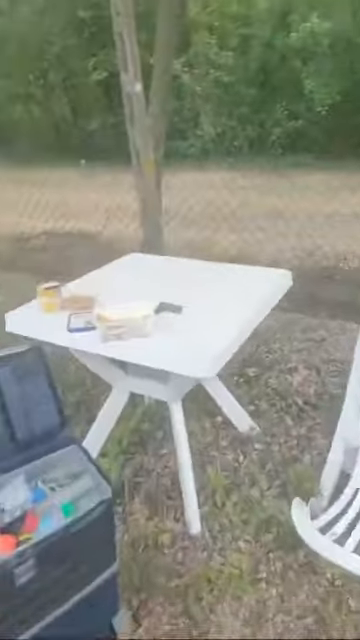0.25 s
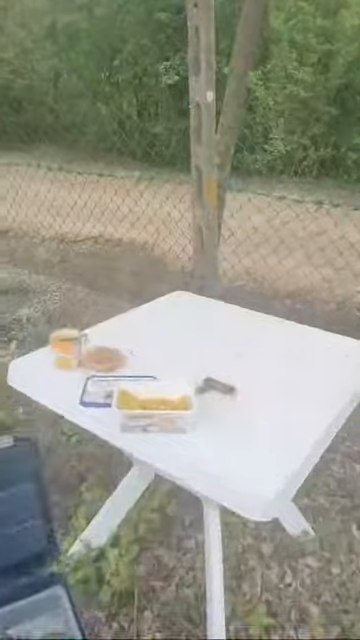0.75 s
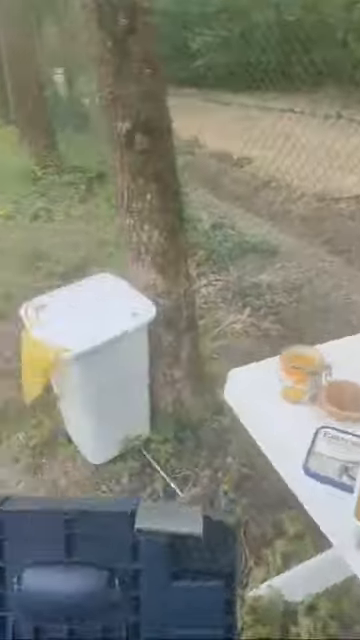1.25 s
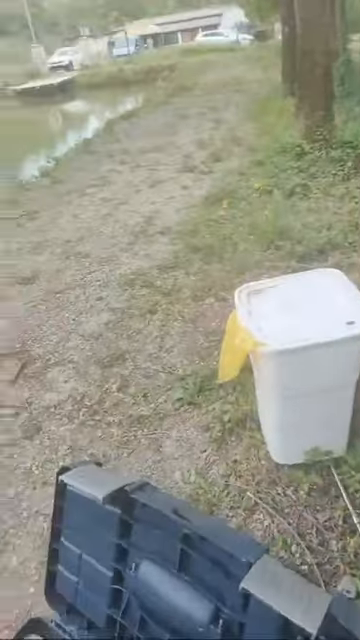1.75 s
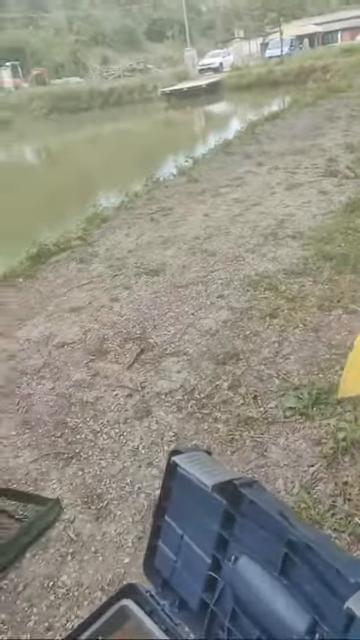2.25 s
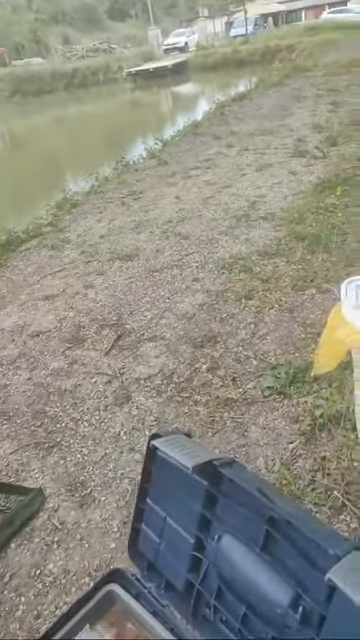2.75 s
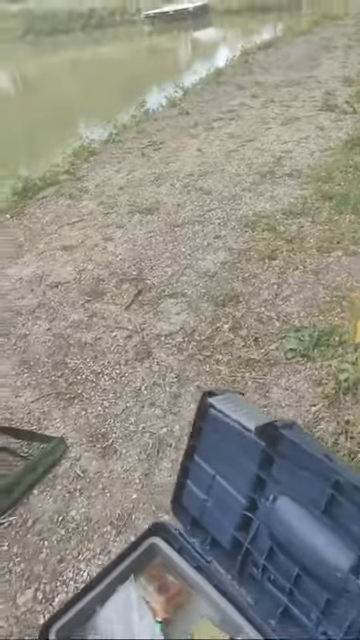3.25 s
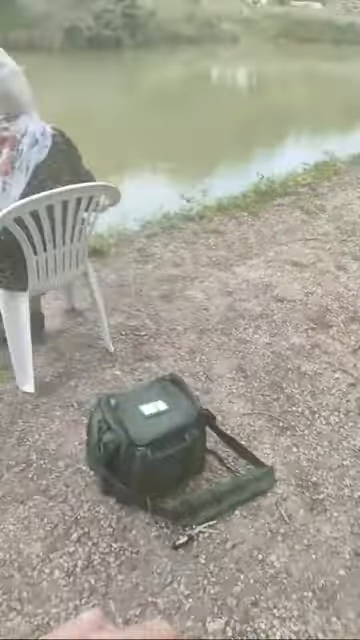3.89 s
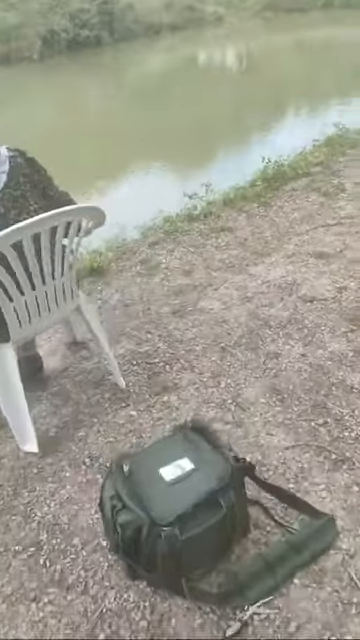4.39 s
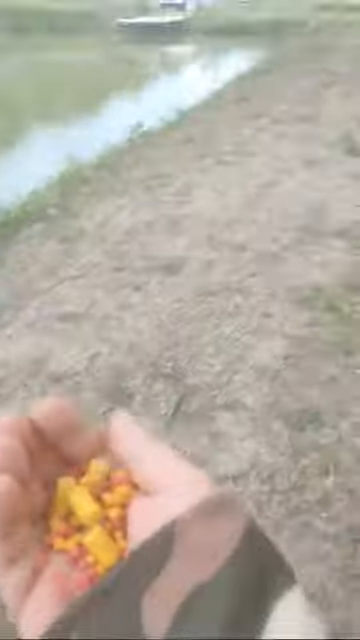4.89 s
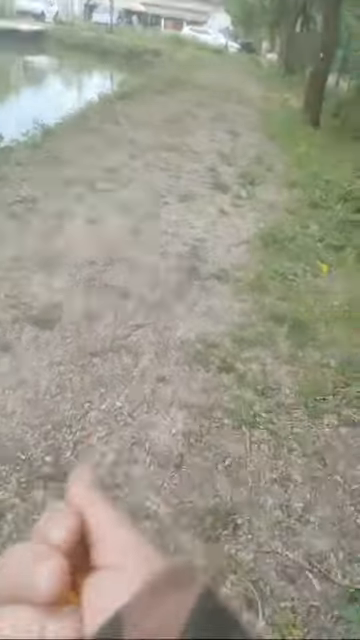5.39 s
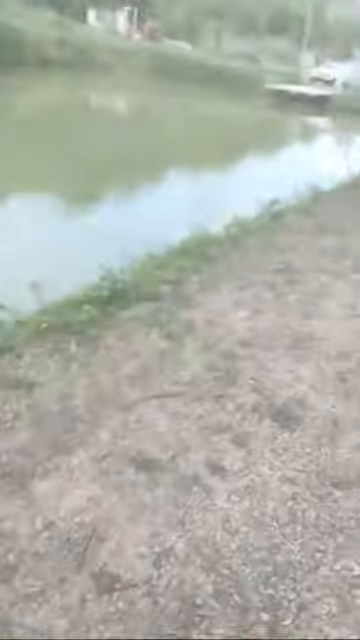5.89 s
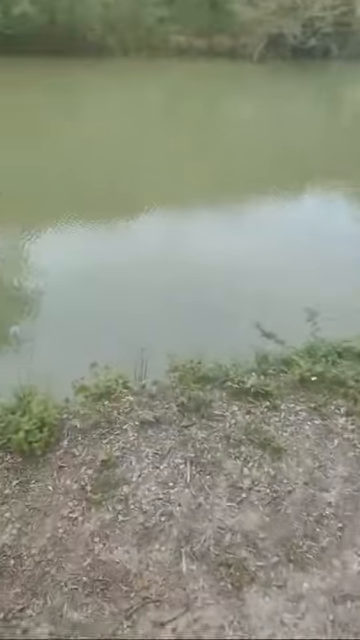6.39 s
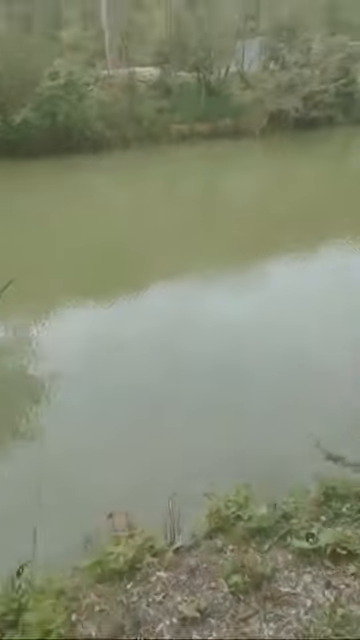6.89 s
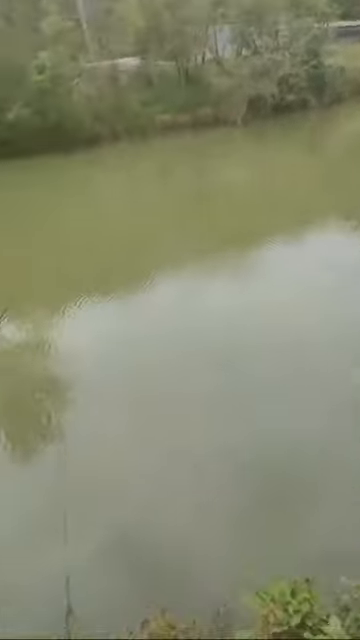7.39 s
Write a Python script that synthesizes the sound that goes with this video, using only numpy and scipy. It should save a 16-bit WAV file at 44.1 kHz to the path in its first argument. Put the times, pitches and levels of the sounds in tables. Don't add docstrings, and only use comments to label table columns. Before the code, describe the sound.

Outdoor lakeside walk: soft air and birdsong, a gritty hollow plastic scrape, cloth rubs, then crunching pebbles under low buffeting wind.

```python
import sys
import numpy as np
from scipy import signal
from scipy.fft import rfft, irfft, next_fast_len
from scipy.io import wavfile

SR = 44100
rng = np.random.default_rng(int(sys.argv[2]) if len(sys.argv) > 2 else 0)


def how_loud(loudness_db):
    steps = np.asarray(loudness_db, float) / 20
    return 10 ** steps


def transcribe(signal):
    frames = np.atleast_2d(signal).T
    limited = np.clip(frames, -1, 1)
    pcm = np.round(limited * 32767).astype(np.int16)
    wavfile.write(sys.argv[1], SR, pcm)


N = 336924

# time_s, rumble_db
BREEZE = [(0, -49.5), (.45, -44.5), (1.05, -49), (1.45, -54), (2.1, -58.5), (2.9, -54), (3.4, -66),
          (3.95, -60.5), (4.15, -49.5), (4.9, -50.5), (5.6, -48.5), (5.9, -54), (6.25, -34), (6.6, -30.5),
          (7.05, -42.5), (7.35, -31.5), (7.64, -38)]
# time_s, peak_db, pitch_hz
THUMPS = [(4.611, -28.5, 132), (4.688, -28, 194), (4.706, -23.5, 184), (4.724, -23, 137), (5.282, -14, 238),
          (5.336, -18.5, 160), (5.38, -22.5, 193), (5.424, -22, 220), (5.525, -26, 175.5),
          (5.959, -27, 157.2), (6.148, -17.5, 197), (6.208, -18.5, 204), (6.27, -20, 212),
          (6.345, -17.5, 211), (6.475, -17, 208), (6.54, -19, 154), (6.587, -24, 176), (6.628, -20, 194),
          (6.667, -19, 240), (6.727, -21.5, 180), (6.758, -24, 240), (6.904, -22.5, 240),
          (7.103, -24.5, 169), (7.314, -19.5, 173), (7.342, -20.5, 190), (7.385, -21, 195),
          (7.427, -24.5, 188), (7.52, -16.5, 177), (7.546, -22, 257), (7.602, -17.5, 191)]
# time_s, peak_db, pitch_hz
PUFFS = [(.377, -34, 190), (.647, -35, 167), (.818, -36, 200), (1.433, -36, 135), (2.271, -32, 109),
         (2.29, -28.5, 165), (2.397, -34.5, 146), (2.435, -35, 127), (2.657, -40, 181), (2.466, -32.5, 162),
         (2.756, -38.5, 140), (2.999, -36.5, 124), (3.315, -35, 111.5), (3.604, -30, 136),
         (3.728, -41.5, 130), (4.297, -28, 140), (4.774, -33, 145), (5.93, -32.5, 136)]
# time_s, peak_db
BUMPS = [
    (1.977, -28.5),
    (1.99, -29.5),
    (2.205, -30.5),
    (2.339, -30.5),
]
# middle_s, half_length_s, depth_db
LULLS = [(1.198, 0.08, -7.5), (1.688, 0.11, -26), (2.296, 0.039, -3), (5.035, 0.1, -21.5),
         (5.402, 0.1, -10), (5.728, 0.076, -24), (6.456, 0.017, -13), (6.502, 0.015, -21),
         (7.168, 0.064, -10.5), (6.881, 0.013, -9), (7.055, 0.014, -9), (6.971, .015, -7.5)]
# pitch_hz, level_db_per_hz
RUMBLE_COLOUR = [(15, -63), (25, -43), (59, -8), (162, 1.5), (316, -14), (349, -16.5), (700, -32.5),
                 (910, -40.5), (1540, -120)]

# time_s, pressure_db
SCRAPE = [(1.84, -46), (1.885, -38), (1.98, -35), (2.05, -43), (2.19, -33), (2.3, -42), (2.58, -47.5),
          (2.66, -43.5), (2.86, -56.5)]
# middle_s, half_length_s, change_db
LEANS = [(1.89, 0.013, 3), (1.905, 0.0082, -7.5), (1.946, 0.019, 0.5), (2.012, 0.016, -2.5),
         (2.108, 0.006, -4), (2.62, .006, 1), (2.145, 0.0097, 2), (2.161, .01, -3.5), (2.222, 0.013, 3.5),
         (2.307, .015, -3), (2.4, .012, -4), (2.515, 0.016, 1.5), (2.562, 0.011, 9.5), (2.58, .005, -1),
         (2.718, 0.0074, -7.5), (2.762, 0.0069, -7), (2.774, 0.0094, 10.5), (2.806, 0.0056, 10)]
# time_s, peak_db, bright_edge_db (relative)
SNAGS = [(1.85, -26, -12), (1.921, -39.5, 19), (1.954, -25, 6), (1.973, -14, -9), (1.984, -27.5, -2),
         (2.097, -46, 11), (2.116, -25.5, 5), (2.137, -39, 2), (2.185, -38, 14), (2.233, -21, -15),
         (2.271, -27, -11), (2.329, -23, 6), (2.362, -29, -19), (2.444, -26, 0), (2.588, -29.5, 2),
         (2.621, -30.5, 4.5), (2.641, -27, -1), (2.727, -33.5, 5), (2.767, -32.5, 5), (2.791, -22.5, -3),
         (2.811, -15, -14.5), (2.863, -35.5, -4)]
# time_s, peak_db, bright_edge_db (relative)
TICKS = [(2.251, -26, -10), (2.279, -20.5, 3.5), (2.385, -28, -5), (2.423, -29.5, 4.5), (2.465, -34, -8),
         (2.487, -34, 5), (2.498, -34, 7), (2.542, -28, -9), (2.571, -19, -12), (2.653, -26.5, 1),
         (2.68, -38, 3), (2.691, -28.5, -1), (2.698, -28, 3), (2.738, -35, 2), (2.837, -35, -1),
         (2.853, -35, -1)]
# pitch_hz, level_db_per_hz
SCRAPE_COLOUR = [(150, -60), (250, -7.5), (325, -13), (510, -4), (690, -7), (960, 4.5), (1310, -7),
                 (1910, -7.5), (2700, -7), (3400, -6.5), (3770, 1), (4990, -21.5), (6470, -14),
                 (8400, -26.5), (10300, -25), (16000, -33)]

# middle_s, half_length_s, grit_db, top_db (relative), dull_db (relative)
SCUFFS = [(0.876, 0.047, -66.5, 2, 6), (1.727, 0.1, -83.5, 11, -7), (1.373, 0.04, -57, 0.5, -1.5),
          (1.46, 0.039, -70, 3.5, 1), (3.072, 0.014, -55.5, -0.5, -13), (3.235, 0.016, -59, -7, -28),
          (3.495, 0.016, -62.5, -2.5, -28), (4.03, .04, -75, 1, 0), (3.845, 0.049, -70.5, -2.5, -12),
          (4.726, 0.032, -76, -4, 0), (5.294, 0.17, -70, -6, -29), (5.828, 0.046, -44.5, -8, -4.5),
          (5.946, 0.06, -51.5, -18, -10.5), (6.154, 0.054, -46, -7.5, -3), (6.254, 0.052, -59.5, -10, -1),
          (6.423, 0.054, -66, -8, 4.5), (6.926, 0.019, -49.5, -14, -0.5), (7.303, 0.036, -57.5, -3, 3),
          (7.43, 0.027, -63.5, 0, 10), (7.463, .012, -71, 2, 0), (7.588, 0.07, -70.5, 0.5, 5),
          (6.082, 0.043, -69.5, -2, -4), (7.096, 0.03, -68, -3, 6), (6.578, 0.021, -62, -7, -3),
          (6.885, .012, -70, -4, 2)]
# time_s, peak_db, low_ring_hz, bright_db (relative), top_db (relative)
PEBBLES = [(1.217, -49, 2480, -13, -13), (3.057, -41, 3900, -11, -8), (4.808, -36, 3600, -13, -21),
           (5.783, -42.5, 1000, -7, -1), (6.21, -41, 1500, -10, -15), (6.758, -55, 2000, -5, 3),
           (6.881, -45, 1900, -8, -7), (6.929, -48, 2000, -5, 3), (7.024, -50, 1200, -20, -30),
           (7.083, -48, 2200, -12, -8), (7.407, -53, 2000, 3, -3), (3.26, -50.5, 2930, -6, -28),
           (4.809, -33.5, 2480, -8, -32), (5.419, -43, 2730, -12, -12), (5.523, -45.5, 2520, -13, -25),
           (5.643, -30.5, 1390, -46.5, -23), (6.111, -28.5, 1600, 7.5, -23), (6.25, -50, 902, 7, 11.5),
           (6.328, -44.5, 2300, -12, -7), (6.426, -41.5, 1780, -8, -2), (6.57, -35, 2480, -1.5, -3),
           (6.766, -48, 2070, -3, 10), (6.869, -43, 1880, -10, -12), (6.916, -24.5, 2140, 3, -3.5),
           (7.016, -42, 2280, -26, -36), (7.073, -41.5, 1930, -15, -11), (7.102, -33.5, 2230, -42, -14),
           (7.264, -35, 1480, -7, -2), (7.284, -24, 2240, -14.5, -6.5), (7.304, -34.5, 1580, -4, -29),
           (7.415, -35.5, 3500, -0.5, -4), (7.435, -32, 3600, -6, -3), (7.463, -25.5, 2080, -34, -41),
           (7.542, -23, 2900, -4, -8.5), (7.546, -27, 1510, -30, -30), (7.634, -23, 1100, -30, -17)]
# pitch_hz, width_hz, level_db
GRIT = [(5910, 420, -7.5), (6520, 390, -6), (7160, 350, -10), (8920, 660, -24.5)]
# pitch_hz, width_hz, level_db
DIRT = [(1000, 400, -9), (1570, 280, -1), (2800, 600, 1.5), (4300, 400, -8)]

# time_s, rustle_db
RUSTLE = [(4.3, -104), (5.3, -79), (5.9, -71.5), (6.5, -65), (7.0, -63.5), (7.2, -60.5), (7.64, -50)]
# middle_s, half_length_s, level_db
GRIPS = [(1.051, 0.025, -53), (4.635, 0.046, -59), (4.72, 0.03, -58.5), (5.127, 0.027, -54.5),
         (5.046, 0.017, -57), (5.268, 0.0069, -51), (6.226, 0.013, -43.5), (6.703, 0.047, -64),
         (6.847, 0.014, -50)]
# start_s, length_s, level_db, whistle_hz,
# rising_share (of the length)
NARROW_HISSES = [(0.447, 0.057, -48.5, 3270, 0.26), (0.546, 0.23, -56.5, 3610, 0.067),
                 (2.885, 0.35, -62, 3770, 0.12), (3.055, 0.026, -45.5, 4400, 0.29),
                 (3.057, 0.035, -46.5, 3890, 0.21), (3.772, 0.26, -56.5, 3620, 0.27),
                 (4.551, 0.218, -48.5, 3700, 0.84), (5.058, 0.37, -52, 3720, 0.4),
                 (6.507, 0.16, -51.5, 3520, 0.395),
                 (4.70, 0.062, -52, 4150, 0.59), (5.245, 0.039, -41.5, 3900, 0.61),
           (4.56, 0.174, -64, 2450, 0.507), (5.16, .035, -62, 6200, .5), (5.25, 0.032, -56.5, 6700, .5),
           (5.29, 0.12, -65, 6300, .3), (5.11, .22, -72, 9200, .7), (4.71, .05, -71, 8600, .5),
           (6.515, 0.032, -61, 11600, 0.52), (6.375, 0.037, -58, 6000, .5), (6.695, .1, -59.5, 6550, 0.09),
           (6.5, 0.098, -57, 6500, .2), (5.045, 0.039, -52, 1800, .5), (6.4, 0.034, -60, 1400, .5),
           (1.352, 0.04, -50, 5000, .4), (1.385, .03, -59, 6600, .5), (5.83, .04, -55, 2400, .4),
           (5.4, 0.025, -59, 1500, 0.52), (1.8, .045, -70, 11400, .5), (1.655, .045, -70, 9700, .5),
           (1.75, .03, -72, 10000, 0.49), (6.5, 0.043, -66, 1600, .5), (5.925, .03, -62, 3900, 0.62),
           (6.125, 0.059, -49, 4300, .3), (5.78, 0.042, -47.5, 3250, 0.29), (2.975, .04, -57, 3800, 0.31),
           (5.055, 0.034, -46.5, 700, 0.49), (7.485, 0.028, -52, 860, .6), (6.13, 0.037, -51, 2600, .4),
           (1, .05, -60, 3200, 0.51), (5.97, 0.051, -54, 1550, 0.49), (5.795, 0.074, -51, 2500, 0.32),
           (4.63, .014, -41, 600, .2), (5.1, .04, -57.5, 1450, 0.49), (.455, 0.039, -55, 2600, 0.52),
           (7.33, 0.046, -52, 2250, 0.49)]

# start_s, length_s, pitch_hz, level_db
HELD_NOTES = [(0.711, 0.07, 3390, -56), (1.338, 0.12, 3460, -55), (1.577, 0.044, 3160, -52),
              (1.735, 0.04, 2264, -58), (2.87, 0.1, 2940, -48.5), (3.285, 0.1, 3330, -53.5),
              (3.5, 0.06, 3960, -60.5), (3.548, 0.097, 3394, -47), (3.138, 0.028, 2940, -43.5),
              (7.568, 0.024, 2720, -45), (7.451, 0.019, 2120, -48)]
# start_s, length_s, from_hz, to_hz, level_db
SLIDES = [(0.325, 0.15, 3980, 3940, -65.5), (0.482, 0.16, 2760, 3010, -55.5),
          (0.69, 0.024, 3650, 3450, -53), (0.777, 0.17, 3065, 3220, -63.5), (0.979, 0.12, 3640, 3650, -58),
          (1.142, .075, 2600, 3000, -63.5), (1.21, 0.063, 2980, 2870, -65.5),
          (1.277, 0.072, 3850, 3730, -61.5), (1.49, 0.095, 2390, 3070, -66),
          (1.795, 0.042, 1770, 1850, -60), (2.488, .05, 2210, 2300, -43), (2.87, 0.15, 1876, 2070, -64),
          (3.01, 0.11, 2060, 2045, -61.5), (2.835, 0.036, 3250, 3080, -52),
          (3.102, 0.034, 2605, 2764, -49.5), (3.172, .03, 2800, 2200, -61), (3.2, .03, 2380, 2340, -61.5),
          (3.419, 0.043, 3850, 3940, -50.5), (3.693, 0.047, 2920, 2730, -47.5),
          (3.636, 0.02, 3700, 2310, -49), (3.659, 0.028, 2480, 1840, -59), (3.804, 0.055, 3280, 3010, -52),
          (3.84, 0.042, 2870, 2350, -54), (3.08, .022, 3400, 2800, -70), (3.274, .03, 3800, 3400, -64),
          (3.385, .04, 3370, 3330, -62), (0.453, 0.023, 3650, 2750, -52), (7.375, .04, 2810, 2850, -63),
          (7.375, .04, 1890, 1900, -58), (7.378, .04, 950, 950, -61), (7.486, .045, 2250, 2140, -61),
          (7.599, .04, 2740, 2650, -52), (7.185, 0.046, 1940, 2290, -64)]
# pitch_hz, level_db_per_hz
AIR_COLOUR = [(24, -52), (40, -6), (81, 0), (167, -6), (290, -6.5), (1120, -15.5), (1720, -18.5),
              (2980, -14.5), (4460, -23), (6490, -22.5), (7930, -35), (10200, -33), (16000, -36.5)]


def rms_one(x):
    return x / np.sqrt(np.mean(x ** 2) + 1e-20)


def in_time(rows, fade=0.012):
    s, *columns = np.transpose(rows)
    t = np.arange(N) / SR
    gate = np.clip(np.minimum(t - s[0], s[-1] - t) / fade + .5, 0, 1)
    return [gate] + [np.interp(t, s, column) for column in columns]


def coloured(x, points):
    hz, level_db = np.transpose(points)
    size = next_fast_len(N)
    grid = np.arange(size // 2 + 1) * SR / size + 1
    gain = how_loud(np.interp(np.log(grid), np.log(hz), level_db, left=-90, right=-90))
    return rms_one(irfft(rfft(x, size) * gain, size)[:N])


def band(x, low_hz, high_hz):
    sos = signal.butter(2, [low_hz, min(high_hz, .45 * SR)], "band", fs=SR, output="sos")
    return signal.sosfilt(sos, x)


def resonance(x, hz, width_hz):
    r = np.exp(-np.pi * width_hz / SR)
    ring = [1, -2 * r * np.cos(2 * np.pi * hz / SR), r * r]
    return signal.lfilter(np.array([1, 0, -1]) * (1 - r * r) / 2, ring, x)


def modes(x, table):
    return sum((-1) ** k * how_loud(level_db) * resonance(x, hz, width_hz)
               for k, (hz, width_hz, level_db) in enumerate(table))


def drift(rate_hz):
    r = np.exp(-2 * np.pi * rate_hz / SR)
    slow = signal.lfilter([1], [1, -2 * r, r * r], rng.standard_normal(N + SR))
    return 2 * np.tanh(rms_one(slow[SR:]) / 2)


def grains(per_s, spread_db):
    sizes = how_loud(spread_db * np.minimum(rng.exponential(1, N), 5)) * rng.choice([-1, 1], N)
    return sizes * (rng.random(N) < per_s / SR)


def knock(draw, part, t60, rise=0.0003):
    t = np.arange(len(draw)) / SR
    decay = how_loud(-60 * t / t60) + 3.5 * how_loud(-60 * t / (0.17 * t60))
    sound = part(draw * (1 - np.exp(-t / rise)) * decay)
    return sound / np.abs(sound).max()


def swell(s, half):
    near = slice(max(round((s - 2 * half) * SR), 0), round((s + 3 * half) * SR))
    away = (np.arange(N)[near] / SR - s) / half
    return near, np.where(away < 0, np.exp(-away ** 8), np.exp(-away ** 2))


def add(out, s, piece):
    i = max(round(s * SR), 0)
    out[i:i + len(piece)] += piece[:N - i]


def breeze():
    gate, level_db = in_time(BREEZE)
    t = np.arange(N) / SR
    level_db = level_db + sum(depth_db * np.exp(-((t - s) / half) ** 4) for s, half, depth_db in LULLS)
    rebounds = [(s + 0.01905, peak_db - 15, 160) for s, peak_db, hz in THUMPS]
    bumps = [(s, peak_db, 400) for s, peak_db in BUMPS]
    pops = PUFFS + THUMPS + rebounds + bumps
    eddies = np.zeros(N)
    for (s, peak_db, hz), turn in zip(pops, rng.random(len(pops))):
        cycles = np.arange(-2, 4, hz / SR)
        sweep = cycles - 0.13 * cycles ** 2
        envelope = np.exp(-(cycles / np.where(cycles < 0, .7, 1.1)) ** 2)
        add(eddies, s - 2 / hz, how_loud(peak_db - 0.22) * envelope * np.cos(2 * np.pi * (sweep + turn)))
    fading = np.exp(-1 / (0.0075 * SR))
    wake = signal.lfilter([1 - fading], [1, -fading], np.abs(eddies))
    rumble = coloured(rng.standard_normal(N) * how_loud(3.0 * drift(25)), RUMBLE_COLOUR)
    return eddies + (how_loud(level_db - 1.0) + 0.43 * wake) * rumble


def scrape():
    gate, low_db = in_time(SCRAPE)
    since_start = np.arange(N) / SR - SCRAPE[0][0]
    for s, half, change_db in LEANS:
        low_db = low_db + change_db * np.exp(-((np.arange(N) / SR - s) / half) ** 2)
    bright_db = -1.5 + 3 * since_start
    slips = grains(3000 * how_loud(3.4 * drift(60)), spread_db=3.3) * how_loud(1.6 * drift(38))
    body = coloured(slips, SCRAPE_COLOUR)
    body = body + modes(body, [(944, 190, -6.5), (3850, 320, 4.5), (6560, 570, -9)])
    edges_hz = [200, 450, 700, 1200, 1800, 2600, 3300, 5000, 8000, 17000]
    parts = [(-1) ** k * band(body, low_hz, high_hz) * how_loud(2.6 * drift(30))
             for k, (low_hz, high_hz) in enumerate(zip(edges_hz, edges_hz[1:]))]
    parts[-1] = parts[-1] * how_loud(5 - 15 * np.clip(since_start, 0, 1))
    low, bright = rms_one(sum(parts[:5])), rms_one(sum(parts[5:]))
    return gate * how_loud(low_db) * (low + how_loud(bright_db) * bright) + scrape_cracks()


def scrape_cracks():
    out = np.zeros(N)
    for table, t60, rise, trim_db in [(SNAGS, .04, .0009, -1.5), (TICKS, .014, .0003, -6)]:
        for (s, peak_db, edge_db), draw in zip(table, rng.standard_normal((len(table), 1500))):
            shift = 1 + 0.067 * np.tanh(draw[0])
            hollow_modes = [(468, 150, -3), (950 * shift, 220, 9.5), (2200 / shift, 1600, -5.5)]
            edge_modes = [(3800 / shift, 330, 13.0), (6600 * shift, 520, 2.5), (10200, 2800, -12.0)]
            hollow = knock(draw, lambda x: modes(x, hollow_modes), t60, rise)
            edge = knock(draw, lambda x: modes(x, edge_modes), t60, rise)
            add(out, s, how_loud(peak_db + trim_db) * (hollow + how_loud(edge_db) * edge))
    return out


def soles():
    grit = grains(14000, spread_db=2.0) * how_loud(1.5 * drift(25))
    bright = rms_one(sum(resonance(modes(grit, [mode]), mode[0], 610) * how_loud(3.6 * drift(25))
                         for mode in GRIT))
    dull = rms_one(sum(resonance(modes(grit, [mode]), mode[0], 900) * how_loud(2.5 * drift(25))
                       for mode in DIRT))
    top = rms_one(band(grit, 9000, 15700) + resonance(grit, 10200, 1000))
    out = np.zeros(N)
    for s, half, grit_db, top_db, dull_db in SCUFFS:
        near, window = swell(s, half)
        mix = bright[near] + how_loud(top_db) * top[near] + how_loud(dull_db) * dull[near]
        out[near] += window * how_loud(grit_db) * mix
    return out


def pebbles():
    out = np.zeros(N)
    for (s, peak_db, hz, bright_db, top_db), draw in zip(PEBBLES, rng.standard_normal((len(PEBBLES), 1200))):
        def stone_part(x):
            ring = resonance(resonance(x, hz, 350), hz, 680)
            return ring + 0.33 * band(band(x, 550, 2870), 460, 4150)

        stone = knock(draw, stone_part, 0.04, rise=0.0002)
        chip = knock(draw, lambda x: band(modes(x, GRIT), 5000, 6750), 0.015, rise=0.00079)
        spark = knock(draw, lambda x: band(band(x, 4200, 15700), 6100, 22000), 0.02, rise=0.00035)
        add(out, s, how_loud(peak_db + 0.5) * (stone + how_loud(bright_db) * chip + how_loud(top_db) * spark))
    return out


def weeds():
    gate, dull_db = in_time(RUSTLE, fade=0.07)
    brush = grains(8700, spread_db=3.0)
    bright_patches, dull_patches = how_loud(5.0 * drift(14)), how_loud(4.0 * drift(14))
    bright = rms_one(band(resonance(brush, 6330, 220), 3800, 11000)) * how_loud(dull_db - 13) * bright_patches
    dull = rms_one(band(resonance(brush, 2190, 340), 860, 2300)) * how_loud(dull_db) * dull_patches
    return gate * (bright + dull)


def grip():
    housing = [(425, 120, 2.0), (650, 630, -9.5), (1600, 680, -15.0)]
    rub = rms_one(modes(grains(7000, spread_db=5.0), housing))
    out = np.zeros(N)
    for s, half, level_db in GRIPS:
        near, window = swell(s, half)
        out[near] += window * how_loud(level_db) * rub[near]
    return out


def cloth():
    low_pass = signal.butter(2, 135, fs=SR, output="sos")
    noise = signal.sosfilt(low_pass, rng.standard_normal((2, N))) * how_loud(2.6 * drift(26))
    narrow = rms_one(noise[0]) + 1j * rms_one(noise[1])
    out = np.zeros(N)
    for s, long, top_db, hz, rise in NARROW_HISSES:
        near = slice(round((s - .02) * SR), round((s + long + .02) * SR))
        t = np.arange(N)[near] / SR - s
        peak_s = long * np.clip(rise, .01, .99)
        level_db = -20 * np.interp(t, [0, peak_s, long], [rise, 0, 1 - rise])
        gate = np.clip(np.minimum(t, long - t) / 0.014 + .5, 0, 1)
        phase = 2 * np.pi * np.cumsum(hz + 8 * level_db) / SR
        whistle = (narrow[near] * np.exp(1j * phase)).real * np.sqrt(2)
        out[near] += gate * how_loud(top_db + level_db - 6.0) * whistle
    return out


def note_shapes():
    dip, slide_edge_db = 0.028, -3.5
    notes = []
    for s, long, hz, db in HELD_NOTES:
        notes.append([(s, hz * (1 + dip), db - 12),
                      (s + 0.29 * long, hz, db),
                      (s + long, hz * (1 + dip * 0.3), db - 4)])
    for s, long, hz, end_hz, db in SLIDES:
        notes.append([(s, hz, db + slide_edge_db),
                      (s + long / 4, hz + (end_hz - hz) / 4, db),
                      (s + long, end_hz, db + 2 * slide_edge_db)])
    return notes


def warbler():
    song, waver, flutter = np.zeros(N), drift(47.0), drift(136)
    for rows in note_shapes():
        gate, hz, level_db = in_time(rows, fade=0.029)
        phase = 2 * np.pi * np.cumsum(hz * (1 + 0.006 * waver)) / SR
        song += gate * how_loud(level_db + 2.5 + 4.3 * flutter) * np.sin(phase)
    t = np.arange(SR // 3) / SR
    trees = rng.standard_normal(len(t)) * how_loud(-60 * t / 0.36) * (t > .008)
    song = song * how_loud(4.0 * drift(22))
    return song + how_loud(-41) * signal.fftconvolve(song * (.4 + flutter), trees)[:N]


def air():
    return how_loud(-61 + 2.58 * drift(8.0)) * coloured(rng.standard_normal(N), AIR_COLOUR)


def scene():
    near_sounds = breeze() + scrape() + soles() + pebbles() + weeds() + grip() + cloth()
    return (near_sounds + warbler() + air())[None]


def top_cut(x):
    return signal.sosfilt(signal.butter(12, 16950, fs=SR, output="sos"), x)


def record(dry):
    x = signal.sosfilt(signal.butter(4, 45, "high", fs=SR, output="sos"), dry)
    x = signal.sosfilt(signal.cheby2(12, 60, 17000, fs=SR, output="sos"), x)
    return top_cut(x)


dry = scene()
out = record(dry)
transcribe(out)
```